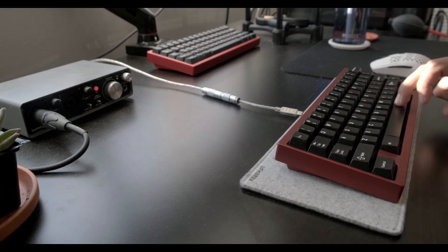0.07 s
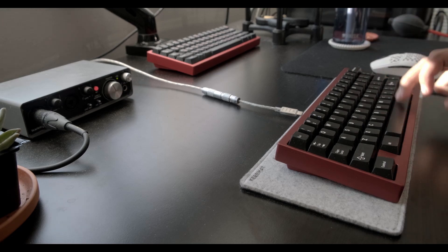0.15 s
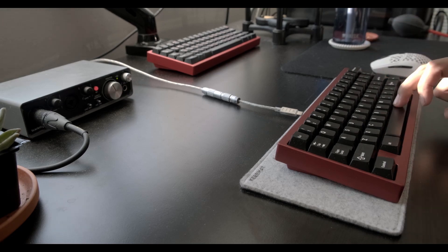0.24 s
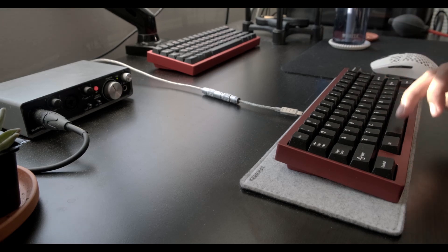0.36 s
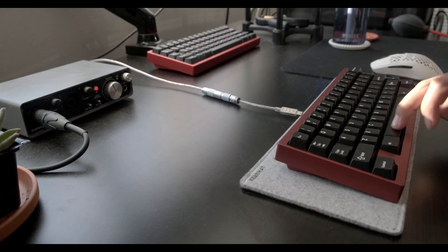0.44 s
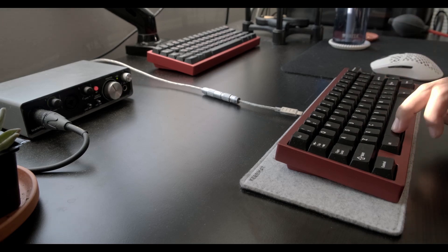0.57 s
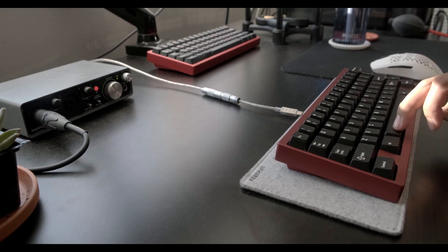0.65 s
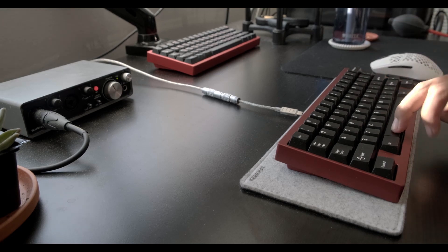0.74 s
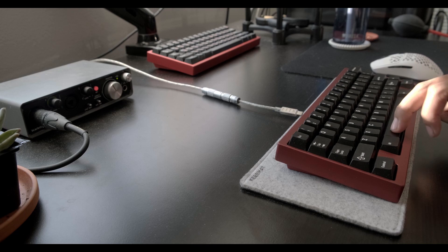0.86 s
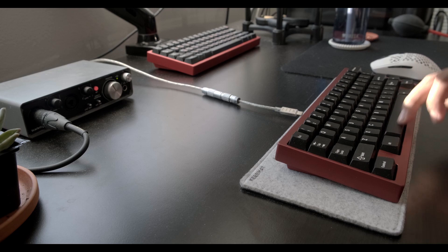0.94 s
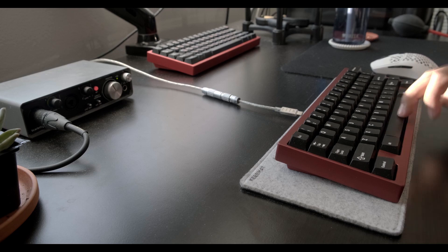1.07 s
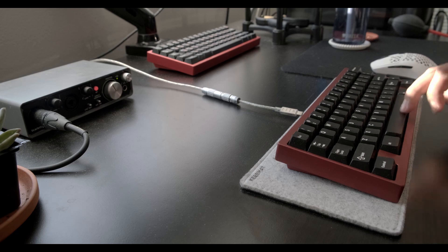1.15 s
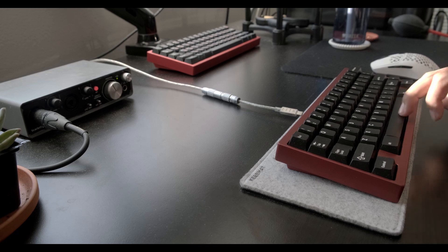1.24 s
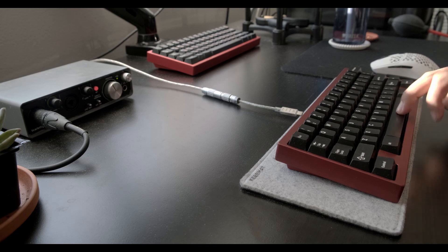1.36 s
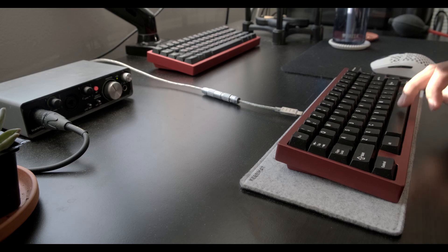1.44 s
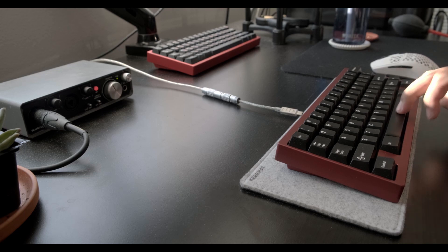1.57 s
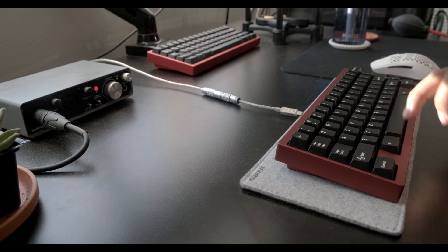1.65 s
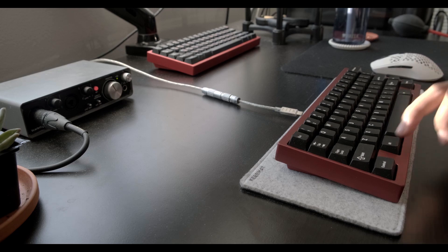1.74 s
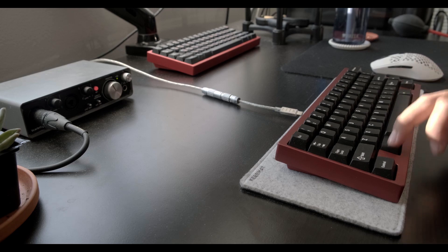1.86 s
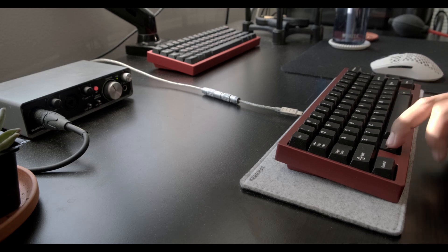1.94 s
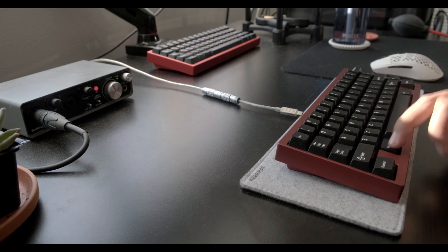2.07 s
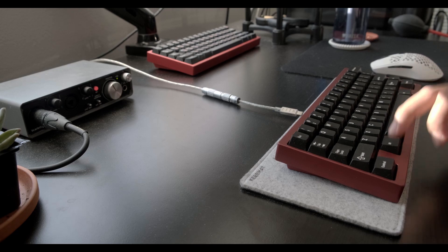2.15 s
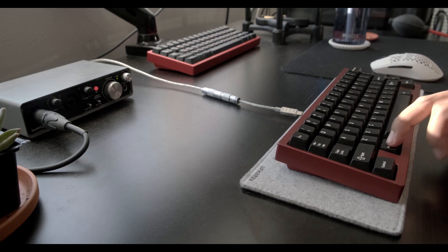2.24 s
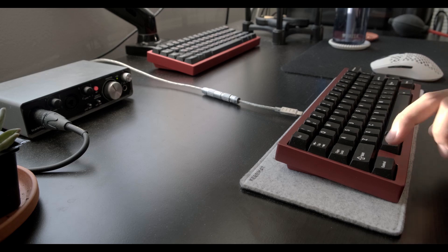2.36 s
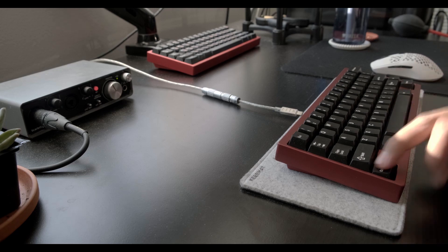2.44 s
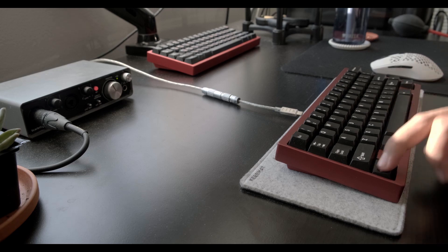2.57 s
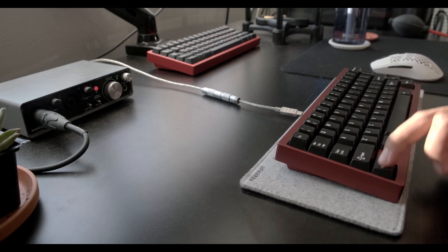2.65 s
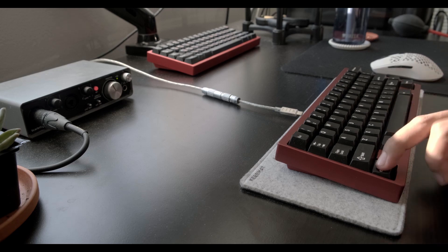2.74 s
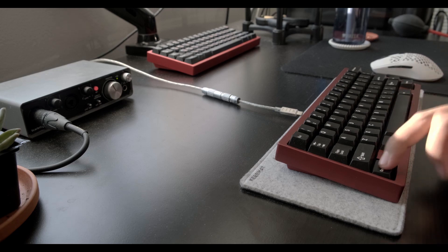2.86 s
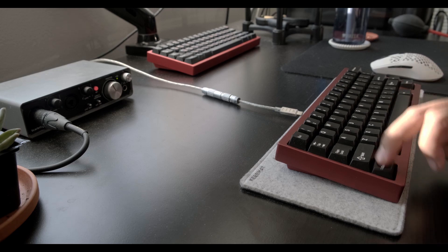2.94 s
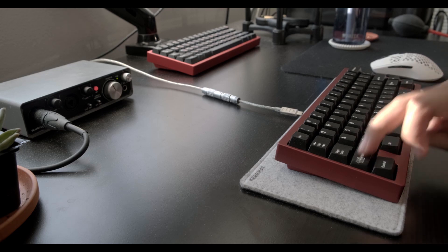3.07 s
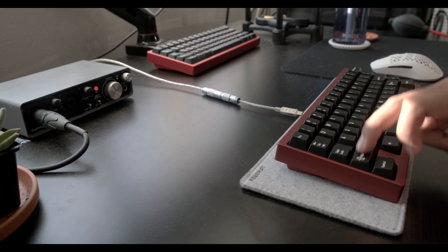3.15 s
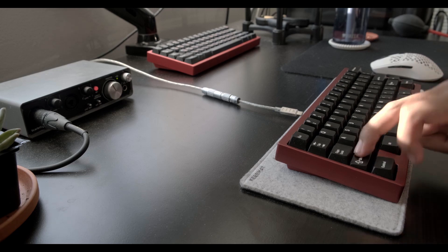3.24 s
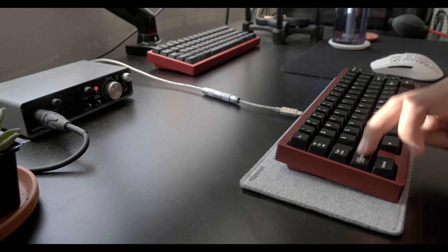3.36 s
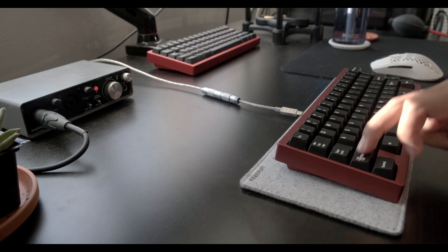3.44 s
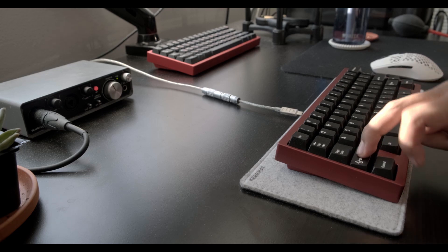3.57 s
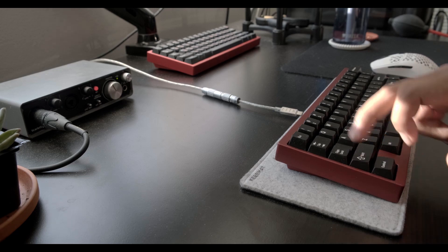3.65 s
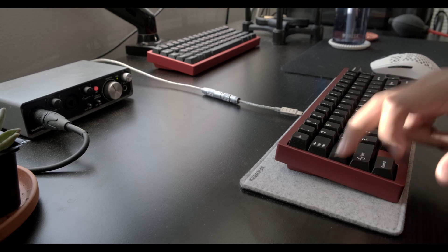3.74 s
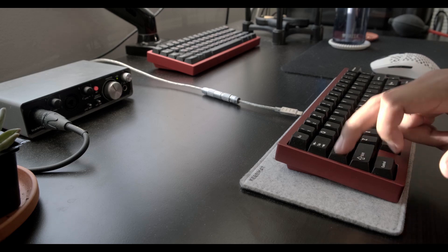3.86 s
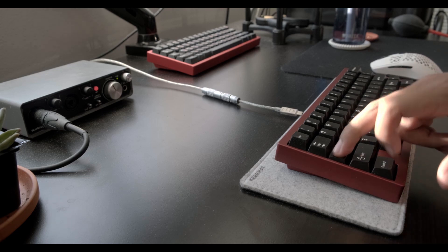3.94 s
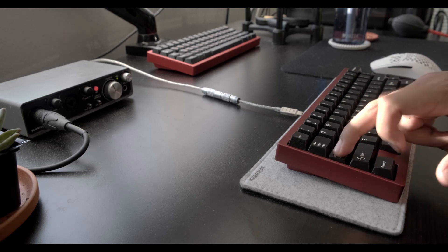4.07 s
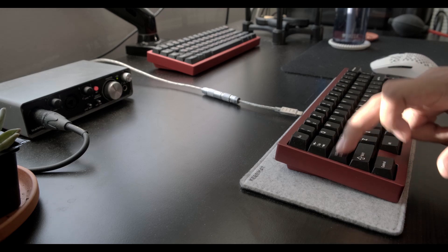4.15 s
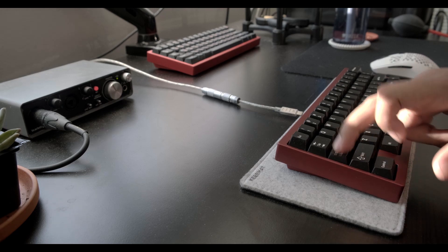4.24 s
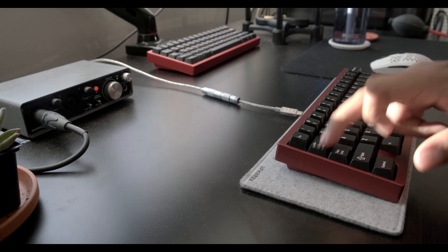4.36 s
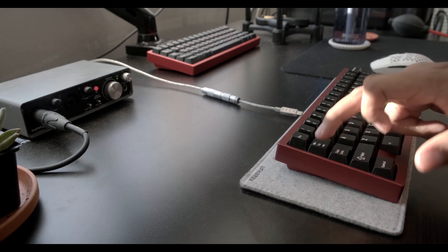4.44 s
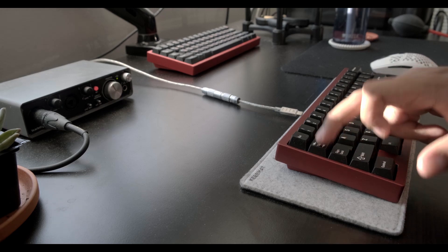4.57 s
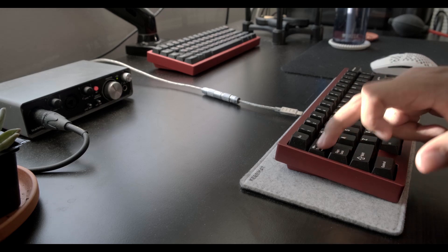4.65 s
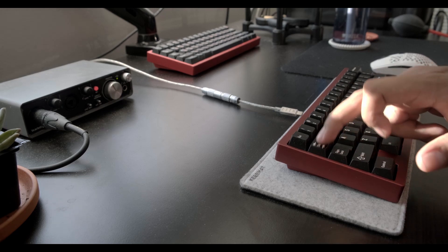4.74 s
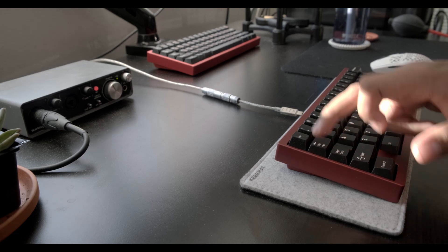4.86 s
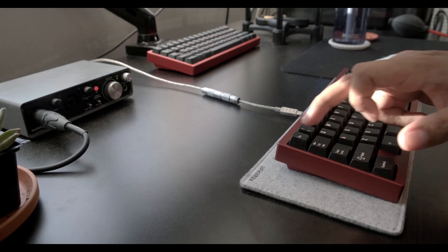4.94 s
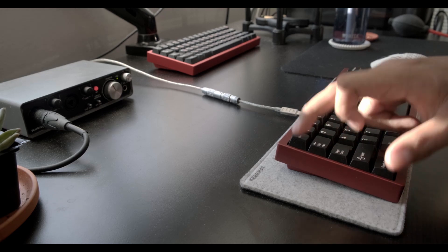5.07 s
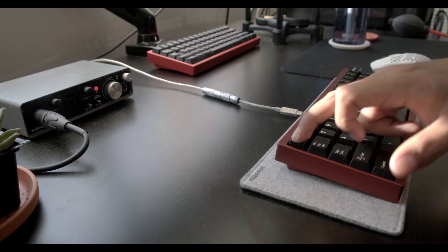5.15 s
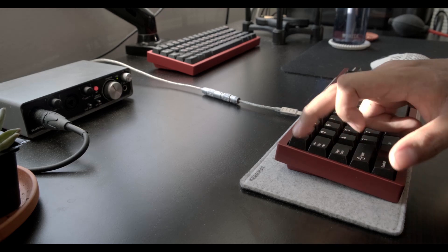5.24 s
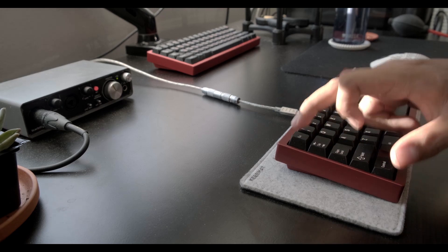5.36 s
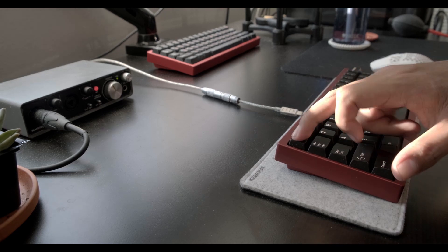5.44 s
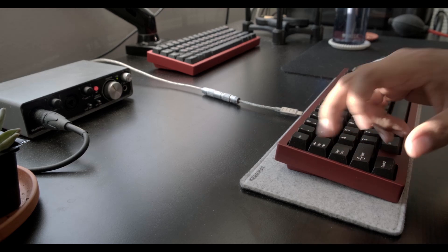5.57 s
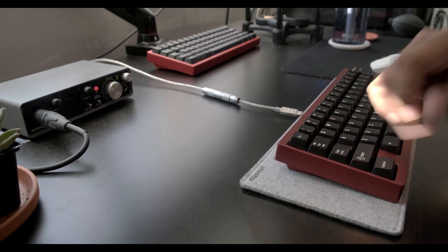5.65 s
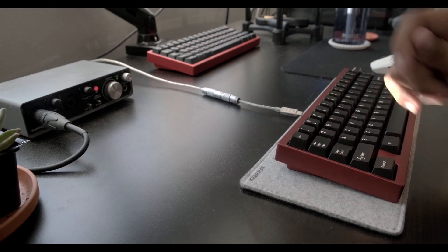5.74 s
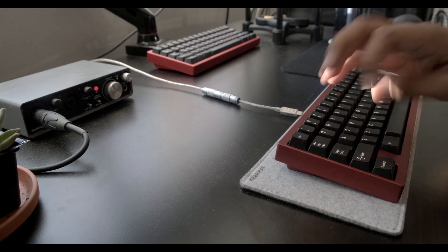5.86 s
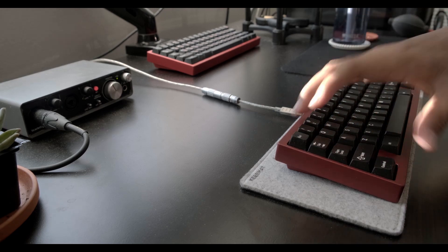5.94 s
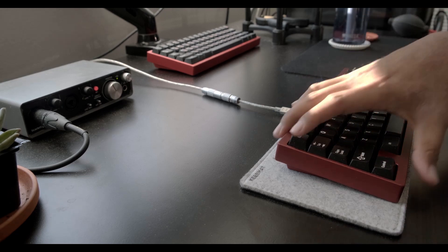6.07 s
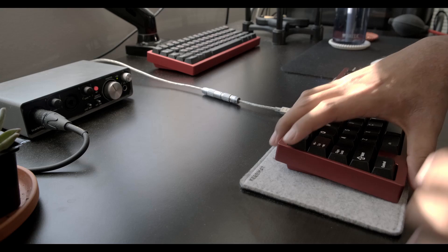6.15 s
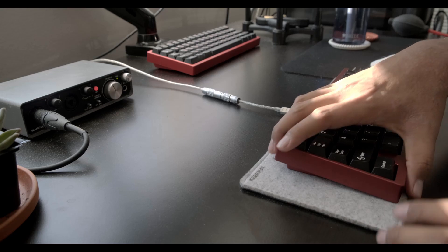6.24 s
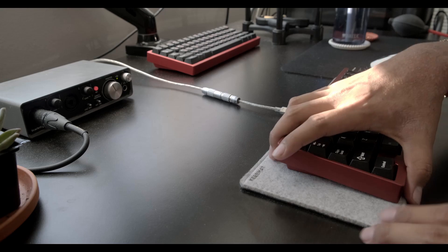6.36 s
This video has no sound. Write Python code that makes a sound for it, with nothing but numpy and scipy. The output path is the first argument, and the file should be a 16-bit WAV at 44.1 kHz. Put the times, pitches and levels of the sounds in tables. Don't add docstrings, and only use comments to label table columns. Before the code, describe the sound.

One finger taps a mechanical keyboard close up, a deep spacebar first, then six keys four times each, ending with faint dry hand brushing.

```python
import sys
import numpy as np
from scipy import signal
from scipy.fft import rfft, irfft
from scipy.io import wavfile
from scipy.ndimage import uniform_filter1d

SR = 44100
rng = np.random.default_rng(int(sys.argv[2]) if len(sys.argv) > 2 else 0)


def wav_out(sig):
    wavfile.write(sys.argv[1], SR, np.round(np.clip(np.atleast_2d(sig).T, -1, 1) * 32767).astype(np.int16))


def nominal_scale(level):
    x = np.asarray(level, float) / 20
    return 10 ** x


N = 282240

# frequency in Hz, level in dB.
HUM = (192, -61)
# peak in seconds, level in dB.
RUMBLE_SWELLS = [(.93, -51), (1.58, -56.5), (2.1, -58), (2.57, -51), (3.27, -54), (4.25, -52), (5.2, -51.5),
                 (6.36, -62)]
# frequency in Hz, density in dB per Hz.
HISS_COLOUR = [(40, -5), (120, -5.5), (160, -9), (340, -3.5), (560, -13), (860, -13), (1900, -23.5),
               (16500, -46)]
HISS_DB = -56.5
SWELL_S, RUMBLE_DB, LULL_S = 0.088, -57.5, 6.0

# centre in Hz, decay time t60 in seconds, level in dB.
ROOM_TAIL = [(332, 0.79, -36.5), (665, 0.11, -20.5), (1560, 0.54, -32), (3050, 0.49, -30),
             (6940, 0.46, -28), (11400, 0.2, -43)]
# delay in seconds, level in dB.
ECHOES = [(.0035, -18.5), (0.0105, -18.5)]
EARLIER_S = 0.074

PART_EDGES_HZ = np.array([600, 1200, 2700, 5500, 9500, 16000])

# contact in seconds, cap level in dB, housing and stem in dB against the cap.
BAR_SIDE_DOWN = [(0.0592, -27.5, -23, -6), (0.204, -29.5, -19.5, -9), (0.4293, -28.5, -16.5, -10),
                 (.57, -30.5, -15, -10), (0.7057, -32, -16.5, -10), (0.8573, -29.5, -22.5, -9)]
BAR_MID_DOWN = [(1.0899, -24, -20.5, -7.5), (1.2316, -26.5, -20.5, -8), (1.3697, -27, -17.5, -5.5),
                (1.5152, -23, -15.5, -4)]
SMALL_DOWN = [(1.8093, -34, 1.5, -4.5), (1.9547, -37.5, -1.5, -5), (2.0971, -36.5, -4, -6),
              (2.2431, -36, -2.5, -0.8)]
CORNER_DOWN = [(2.4687, -25.5, -11.5, -11), (2.5995, -33.5, -12.5, -11.5), (2.742, -33.5, -16, -10.5),
               (2.8846, -33.5, -9.5, -9.5)]
LONG_DOWN = [(3.1085, -36.5, -9, -9.5), (3.2498, -40.5, -7.5, -6), (3.4029, -35.5, -11, -6),
             (3.5373, -37, -9.5, -10.5)]
WIDE_DOWN = [(3.7735, -35, -0.51, -1), (3.9153, -38.5, 0.73, 4), (4.0671, -43.5, -.7, 1.5),
             (4.1989, -44.5, 0.13, 1)]
EDGE_DOWN = [(4.4026, -42, -1, 7.6), (4.5317, -44.5, -1.5, 5.7), (4.6844, -52, -6.5, 4.2),
             (4.7876, -45.5, -0.5, 7)]
TOP_DOWN = [(5.035, -38, -4, 9.6), (5.1583, -39.5, -7.5, .1), (5.2936, -39, -6.5, .1),
            (5.437, -38, -0.5, 2.7)]

# contact in seconds, cap level in dB, housing in dB against the cap.
BAR_SIDE_UP = [(0.126, -30.5, -19.5), (0.2816, -39, -28.5), (0.4896, -37.5, -22), (.8014, -57, -23),
               (0.9636, -46, -49)]
BAR_MID_UP = [(1.1723, -40, -32), (1.312, -38.5, -26), (1.4485, -33.5, -18.5), (1.6135, -33.5, -24.5)]
SMALL_UP = [(1.8973, -51.5, -8), (2.0366, -50.5, -8.5), (2.162, -40.5, -6.5), (2.3282, -50.9, -11)]
CORNER_UP = [(2.541, -43.5, -21), (2.6834, -42.5, -24), (2.8104, -39, -13.5), (2.981, -39, -12)]
LONG_UP = [(3.1824, -50.5, -13), (3.3303, -45, -21), (3.4762, -53.5, -14), (3.6431, -39, -12.5)]
WIDE_UP = [(3.8447, -44, -13), (3.9971, -45, -11), (4.125, -45, -6.5), (4.2711, -43, -7.5)]
EDGE_UP = [(4.453, -44.5, 1.5), (4.5953, -45.5, -1.5), (4.7258, -51.5, -9), (4.8656, -49.5, 1)]
TOP_UP = [(5.0885, -45.5, -9), (5.234, -50, -15), (5.3636, -43, -12), (5.537, -52.5, -11.5)]

# frequency in Hz, width in Hz, level in dB.
BAR_SIDE_DOWN_MODES = [(880, 60, -12), (1350, 200, -3), (1700, 290, 0), (2170, 170, 2), (3310, 630, -8),
                       (4380, 120, -16), (4540, 400, -18), (5730, 730, -22), (8380, 1040, -19),
                       (12730, 700, -32), (14990, 460, -38)]
BAR_MID_DOWN_MODES = [(950, 300, -20), (1400, 200, -6), (1840, 420, -2), (2210, 160, 2), (3190, 490, -7),
                      (3830, 230, -9), (4400, 310, -10), (5760, 460, -23), (8060, 880, -22),
                      (11160, 550, -30), (12720, 1050, -28), (15320, 350, -27)]
SMALL_DOWN_MODES = [(730, 330, -13), (1690, 280, -3), (1970, 180, -5), (2240, 140, 3), (2920, 110, -10),
                    (3870, 670, -8), (5410, 600, -4), (7670, 320, -3), (9440, 850, -11), (12150, 1360, -12),
                    (14500, 600, -19)]
CORNER_DOWN_MODES = [(830, 60, -7.0), (1210, 60, -9.0), (1470, 100, 0.0), (1800, 170, 1.0),
                     (2300, 400, 1.0), (3740, 190, -17.0), (5270, 520, -13.0), (7270, 1190, -14.0),
                     (11250, 1080, -20.0), (12440, 400, -12.0), (15320, 1280, -32.0)]
LONG_DOWN_MODES = [(900, 280, -7), (1078, 40, 0), (1540, 250, -2), (2170, 220, 2), (3020, 230, -11),
                   (3560, 220, -10), (5550, 1100, -10), (7490, 190, -19), (9100, 530, -14),
                   (10990, 820, -18), (13390, 1600, -19)]
WIDE_DOWN_MODES = [(860, 60, 1.0), (1070, 60, -5.0), (1460, 210, -1.0), (2080, 470, 2.0), (3040, 320, 0.0),
                   (3880, 1130, -1.0), (5450, 670, -1.0), (8630, 790, -3.0), (11490, 550, -13.0),
                   (13170, 500, -13.0), (15580, 820, -19.0)]
EDGE_DOWN_MODES = [(900, 60, -5), (1130, 100, -6), (1480, 110, 1), (3020, 870, 0), (3760, 140, 2),
                   (4550, 300, -3), (5410, 1600, -3), (9280, 1600, -13), (12360, 670, -10),
                   (15520, 290, -12)]
TOP_DOWN_MODES = [(790, 170, -14), (1075, 45, -7), (1490, 100, -1), (1850, 210, -5), (2340, 200, 1),
                  (3260, 680, 2), (5120, 780, -4), (8210, 600, -9), (9780, 980, -9), (12160, 990, -6),
                  (14700, 1240, -18)]

# frequency in Hz, width in Hz, level in dB.
BAR_SIDE_UP_MODES = [(900, 300, -12), (1510, 440, 2), (2170, 120, 1), (3150, 590, -7), (3810, 540, -10),
                     (4400, 150, -14), (5510, 130, -19), (7670, 1600, -26), (12230, 890, -29),
                     (15290, 300, -37)]
BAR_MID_UP_MODES = [(650, 60, -16.0), (1470, 180, 3.0), (2110, 230, -2.0), (3310, 610, -11.0),
                    (4940, 80, -24.0), (5880, 520, -24.0), (8420, 940, -32.0), (11450, 1580, -34.0),
                    (15460, 210, -42.0)]
SMALL_UP_MODES = [(720, 150, -4), (1290, 350, -1), (1780, 160, 0), (2180, 80, 3), (3840, 380, -7),
                  (6130, 690, -8), (7410, 230, -14), (8850, 200, -20), (12100, 750, -17)]
CORNER_UP_MODES = [(810, 80, -1.0), (1120, 60, -21.0), (1460, 200, 1.0), (2130, 600, -4.0),
                   (2660, 100, -12.0), (3710, 330, -18.0), (5860, 380, -15.0), (7480, 1450, -27.0),
                   (12230, 220, -19.0)]
LONG_UP_MODES = [(790, 60, -3), (1078, 40, 0), (1810, 760, 1), (2430, 250, -5), (3570, 140, -12),
                 (5370, 170, -4), (10140, 1600, -29), (13010, 350, -33), (14980, 880, -32)]
WIDE_UP_MODES = [(850, 60, 4.0), (1690, 800, 3.0), (3400, 1580, -5.0), (5920, 1390, -13.0),
                 (6870, 140, -4.0), (8980, 390, -15.0), (11460, 630, -25.0), (13070, 180, -16.0),
                 (15250, 1200, -31.0)]
EDGE_UP_MODES = [(1000, 360, -1.0), (1550, 90, 3.0), (2340, 550, -6.0), (3730, 400, 0.0), (6300, 330, 0.0),
                 (8200, 60, -17.0), (10670, 1350, -21.0), (12490, 150, -8.0), (15000, 870, -25.0)]
TOP_UP_MODES = [(800, 120, -3), (1070, 50, 3), (1720, 220, 0), (2290, 170, -1), (3020, 790, 0),
                (5000, 680, -9), (6870, 440, -14), (9420, 560, -12), (11680, 220, -1), (12900, 680, -14)]

# (the same two, then stem in dB against cap).
VOICES_DB = [
    ((-19.5, -1.5), (-34, -4, -8.5)),
    ((-21, -4), (-14, -7, -12)),
    ((-20.5, -4.5), (-4, -6, -5.5)),
    ((-16.5, -0.5), (-8, -9, -14)),
    ((-9, -2.5), (-6.5, -10, -8)),
    ((-7.5, -8), (-5.5, -10, -5.5)),
    ((-6.5, -1), (-4.5, -10, 0.5)),
    ((-13.5, 3.5), (-2.5, 8.5, -1)),
]
STEM_CRISP, SOFT_CASE = 0.28, 0.52

# frequency in Hz, width in Hz, down and up levels in dB against the cap.
RINGS = [
    [(2160, 30, -30, -23), (3690, 30, -18, -11), (4480, 35, -21, -17), (7750, 42, -23, -34)],
    [(2127, 17, -17.5, -13), (3830, 33, -34, -26), (4150, 27, -16, -23), (7700, 30, -27, -45)],
    [(2250, 67, -19, -13), (3880, 60, -25, -22), (6240, 40, -22, -15), (7600, 52, -25, -30),
     (12400, 120, -16, -24)],
    [(1460, 64, -15, -5), (2290, 30, -18, -23), (6240, 70, -29, -11), (9090, 48, -22, -40),
     (12800, 120, -20, -18)],
    [(2240, 33, -17, -14), (5400, 27, -32, -19), (7340, 35, -24, -40), (13100, 40, -32, -36)],
    [(3720, 38, -11, -10), (6720, 35, -24, -20), (8940, 30, -19, -25), (13150, 120, -18, -26)],
    [(3730, 50, -14, -11), (6100, 35, -13, -10), (6430, 35, -14, -16), (12300, 120, -16, -16)],
    [(3870, 30, -11.5, -9), (8420, 40, -26, -30), (11700, 110, -19, -12)],
]

# frequency in Hz, width in Hz, level in dB.
DESK = [(93, 42, 0.33)]
# frequency in Hz, width in Hz, level in dB.
CASE = [(352, 83, -3.5), (397, 116, 6), (548, 230, -12.5), (780, 180, -13.5)]
BAR_DESK_DB, BAR_CASE_DB = -24, -13.5
LANDING_DESK_DB, LANDING_CASE_DB = -48, -54

# frequency in Hz, width in Hz, level in dB.
WIRE = (4600, 700, 0)
WIRE_DB = -10.5

# start in seconds, level in dB, centre in Hz.
TICKS = [
    (0.423, -37, 3000),
    (.782, -66, 11000),
    (1.079, -58, 6400),
    (1.504, -48, 6440),
]

CREAK_FROM_S, CREAK_RISE_S, CREAK_DB = 5.49, 0.1, -63

# loudest in seconds, level in dB, build-up and let-go in dB per second.
BRUSHES = [
    (5.695, -90, 2500, 56),
    (5.745, -72, 300, 64),
    (5.79, -64, 260, 500),
    (5.838, -57, 156, 3000),
    (5.845, -82, 900, 160),
    (6.035, -80.5, 900, 15),
    (6.235, -71, 122, 114),
    (6.325, -85, 150, 255),
]
# peak in seconds, level in dB.
CATCHES = [
    (5.795, -55),
    (5.814, -47),
    (5.836, -67),
    (6.208, -70),
]
CATCH_S, RASP_DB = 0.003, -5.5


def level(x, db):
    return x * nominal_scale(db) / np.sqrt(np.mean(x ** 2))


def noise(lo_hz, hi_hz, size=N):
    sos = signal.butter(2, [lo_hz, hi_hz], "band", fs=SR, output="sos")
    return level(signal.sosfilt(sos, rng.standard_normal(size)), 0)


def walk(rate_hz):
    hold = int(SR / rate_hz)
    steps = np.repeat(rng.standard_normal(N // hold + 1), hold)
    return 1.314 * uniform_filter1d(uniform_filter1d(steps, hold), hold)[:N]


def add(out, x, s):
    i = max(int(s * SR), 0)
    out[i:i + len(x)] += x[:len(out) - i]


def ring(modes, size, rise_cycles, spread_s, scatter_db, narrow):
    hz, width_hz, db = np.transpose(modes)[:, :, None]
    chance = rng.standard_normal((3, len(modes), 1))
    t = np.maximum(np.arange(size) / SR - spread_s * abs(chance[0]), 0)
    sign = (-1.) ** np.arange(len(modes))[:, None]
    strength = width_hz * nominal_scale(db + scatter_db * chance[1]) * sign
    swing = np.sin(2 * np.pi * hz * (1 + 0.006 * chance[2]) * t)
    decay = np.exp(-np.pi * narrow * width_hz * t)
    return strength * swing * decay * (1 - np.exp(-t * hz / rise_cycles))


def swell(s):
    return np.exp(-((np.arange(N) / SR - s) / SWELL_S) ** 2 / 2)


def air():
    hum_hz, hum_db = HUM
    hum_level = np.sqrt(2) * nominal_scale(hum_db + 1.76 * walk(16))
    hum = hum_level * np.sin(2 * np.pi * np.cumsum(hum_hz + 1.2 * walk(24.85)) / SR)
    swells = nominal_scale(RUMBLE_DB) * (1 - swell(LULL_S)) + sum(nominal_scale(db) * swell(s) for s, db in RUMBLE_SWELLS)
    rumble_level = swells * nominal_scale(2.5 + 2.9 * walk(9))
    rumble = rumble_level * np.sin(2 * np.pi * np.cumsum(32 + 1.49 * walk(4.8)) / SR)
    f_hz = np.maximum(np.fft.rfftfreq(N, 1 / SR), 1)
    colour_hz, colour_db = np.transpose(HISS_COLOUR)
    colour = nominal_scale(np.interp(np.log(f_hz), np.log(colour_hz), colour_db))
    hiss = irfft(rfft(rng.standard_normal(N)) * colour, N)
    return hum + rumble + level(hiss, HISS_DB) * nominal_scale(0.1 * walk(4.1))


def blows(strokes, voice_db):
    s, cap_db, housing, *stem = np.transpose(strokes)
    case, spring, *resting_stem = voice_db
    if stem:
        stem = stem[0]
    else:
        stem = resting_stem[0] + STEM_CRISP * (housing - housing.mean())
    case = case + SOFT_CASE * (cap_db.mean() - cap_db)
    return np.transpose([s, cap_db, case, stem, housing, housing + spring])


def clack(stroke, modes, blur):
    size = 1600
    cap_db, case, stem, housing, spring = stroke[1:]
    part_db = cap_db + np.array([case, 0, stem, housing, spring])
    edges_hz = np.array(PART_EDGES_HZ)
    hz = np.transpose(modes)[0]
    blur = blur ** (np.minimum(2200 / hz[:, None], 1) ** 0.7)
    rows = ring(modes, size, rise_cycles=0.35, spread_s=0.00006, scatter_db=1.2, narrow=blur)
    rebound = ring(modes, size, rise_cycles=0.35, spread_s=0.0006, scatter_db=2.0, narrow=0.8 * blur)
    rows = rows + nominal_scale(-15) * np.roll(rebound, int(0.0014 * SR), axis=1)
    power = np.append(0, np.cumsum(abs(rfft(rows.sum(axis=0))) ** 2)) / 800 / 440
    gain_db = part_db - 10 * np.log10(np.diff(power[edges_hz * size // SR]))
    gain_db = np.clip(gain_db, gain_db[1] - 12, gain_db[1] + 12)
    part = np.searchsorted(edges_hz[1:-1], hz)
    body = nominal_scale(gain_db[part]) @ rows
    fade = np.exp(-np.arange(size) / SR / 0.0035)
    housing_crack = level(fade * noise(5100, 10300, size), part_db[3] - 19.0)
    spring_crack = level(fade * noise(7800, 15000, size), part_db[4] - 17.5)
    return body + housing_crack + spring_crack


def room(x):
    t = np.arange(SR // 2) / SR
    tail = np.zeros(len(t))
    for hz, t60_s, db in ROOM_TAIL:
        tail += nominal_scale(db - 60 * t / t60_s) * noise(hz / np.sqrt(2), hz * np.sqrt(2), len(t))
    tail = tail * np.clip(t / 0.00033, 0, 1) / 22
    for s, db in ECHOES:
        add(tail, nominal_scale(db) * np.hanning(9) / 4, s)
    return signal.fftconvolve(x, tail)[:N]


def earlier_stroke():
    out = np.zeros(N)
    before = clack(blows(BAR_SIDE_DOWN, VOICES_DB[0][0])[0], BAR_SIDE_DOWN_MODES, 1.7)
    add(out, room(before)[int(EARLIER_S * SR):], 0)
    return out


def slide(stroke, modes, db):
    t = np.arange(-1300, 2200) / SR
    size = len(t)
    shape = np.where(t < 0, np.clip(1 + t / 0.026, 0, 1) ** 1.7, np.exp(-t / 0.021))
    grit = shape * nominal_scale(4.1 * rng.standard_normal(70).repeat(50))
    voiced = signal.fftconvolve(rng.standard_normal(size), clack(stroke, modes, 1.0)[:300])[:size]
    rustle = level(voiced, 2.1) + nominal_scale(1.0) * noise(1650, 6700, size)
    rustle = rustle + nominal_scale(np.where(t < 0, -4.5, -12.5)) * noise(8200, 17000, size)
    return nominal_scale(db + 0.2 * (stroke[1] + 51)) * grit * rustle, t[0]


def key(down, down_modes, up, up_modes, voices_db, rings):
    out = np.zeros((2, N))
    hz, width_hz, down_ring_db, up_ring_db = np.transpose(rings)
    ways = ((down, down_modes, voices_db[0], down_ring_db, -66, -1),
            (up, up_modes, voices_db[1], up_ring_db, -70, 1))
    for strokes, modes, voice_db, ring_db, slide_db, sign in ways:
        for stroke in blows(strokes, voice_db):
            s = stroke[0]
            metal = np.transpose([hz, width_hz, stroke[1] + ring_db])
            for heard, blur, smear in zip(out, (0.99, 2.2), (1.2, 5.0)):
                add(heard, sign * clack(stroke, modes, blur), s)
                rows = ring(metal, size=4000, rise_cycles=6.0, spread_s=0, scatter_db=3.0, narrow=smear)
                add(heard, (1 / width_hz) @ rows, s)
            scrape, lead_s = slide(stroke, up_modes, slide_db)
            add(out[0], scrape, s + lead_s)
    return out


def desk():
    out = np.zeros(N)
    bar_strokes = BAR_SIDE_DOWN + BAR_MID_DOWN + BAR_SIDE_UP + BAR_MID_UP
    thuds = [(s, db + BAR_DESK_DB, db + BAR_CASE_DB) for s, db, *_ in bar_strokes]
    for run in (SMALL_DOWN, CORNER_DOWN, WIDE_DOWN, TOP_DOWN):
        thuds.append((run[0][0], LANDING_DESK_DB, LANDING_CASE_DB))
    for s, desk_db, case_db in thuds:
        for modes, db in ((DESK, desk_db), (CASE, case_db)):
            rows = ring(modes, size=4000, rise_cycles=0.44, spread_s=0.0011, scatter_db=2.5, narrow=0.85)
            thud = rows.sum(axis=0)
            add(out, nominal_scale(db) * thud / abs(thud).max(), s)
    return out


def wire():
    out = np.zeros(N)
    for s, db, *_ in BAR_SIDE_DOWN + BAR_MID_DOWN:
        ping = ring([WIRE], size=1600, rise_cycles=2.8, spread_s=0, scatter_db=1.5, narrow=0.98)[0]
        add(out, nominal_scale(db + WIRE_DB) * ping / WIRE[1] * 10, s)
    return out


def ticks():
    out = np.zeros(N)
    t = np.arange(300) / SR
    for s, db, hz in TICKS:
        add(out, nominal_scale(db) * np.exp(-t / 0.0015) * noise(hz * 0.85, hz * 1.15, len(t)), s)
    return out


def creak():
    lean = np.clip((np.arange(N) / SR - CREAK_FROM_S) / CREAK_RISE_S, 0, 1)
    return lean * nominal_scale(CREAK_DB + 3.2 * walk(25)) * noise(143, 236)


def hands():
    t = np.arange(N) / SR
    push = np.zeros(N)
    for s, db, rise, fall in BRUSHES:
        push += nominal_scale(db - np.where(t < s, rise * (s - t), fall * (t - s)))
    for s, db in CATCHES:
        push += nominal_scale(db) * np.exp(-((t - s) / CATCH_S) ** 2)
    slips = nominal_scale(1.8 * walk(300))
    firm = (push / push.max()) ** 0.26
    return push * slips * (noise(7300, 14000) + nominal_scale(RASP_DB) * firm * noise(3800, 11000))


def scene():
    played = [(BAR_SIDE_DOWN, BAR_SIDE_DOWN_MODES, BAR_SIDE_UP, BAR_SIDE_UP_MODES),
              (BAR_MID_DOWN, BAR_MID_DOWN_MODES, BAR_MID_UP, BAR_MID_UP_MODES),
              (SMALL_DOWN, SMALL_DOWN_MODES, SMALL_UP, SMALL_UP_MODES),
              (CORNER_DOWN, CORNER_DOWN_MODES, CORNER_UP, CORNER_UP_MODES),
              (LONG_DOWN, LONG_DOWN_MODES, LONG_UP, LONG_UP_MODES),
              (WIDE_DOWN, WIDE_DOWN_MODES, WIDE_UP, WIDE_UP_MODES),
              (EDGE_DOWN, EDGE_DOWN_MODES, EDGE_UP, EDGE_UP_MODES),
              (TOP_DOWN, TOP_DOWN_MODES, TOP_UP, TOP_UP_MODES)]
    keys = sum(key(*one, voices_db, rings) for one, voices_db, rings in zip(played, VOICES_DB, RINGS))
    keys = signal.sosfilt(signal.butter(2, 650, "high", fs=SR, output="sos"), keys)
    boards = ticks() + desk()
    close = keys[0] + boards
    reflected = room(keys[1] + boards + wire()) + earlier_stroke()
    return (close + reflected + hands() + creak() + air())[None]


def roll_off(x):
    return signal.sosfilt(signal.butter(12, 17030, fs=SR, output="sos"), x)


def record(dry):
    top_hz, edge_gain = 15650, 0.07
    low = signal.sosfiltfilt(signal.ellip(6, 0.1, 40, top_hz, fs=SR, output="sos"), dry)
    return roll_off(low + edge_gain * (dry - low))


dry = scene()
out = record(dry)
wav_out(out)
```